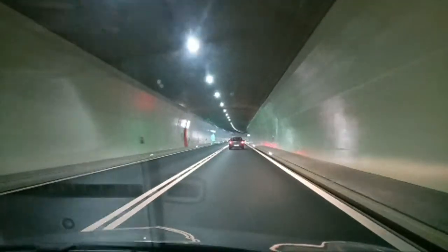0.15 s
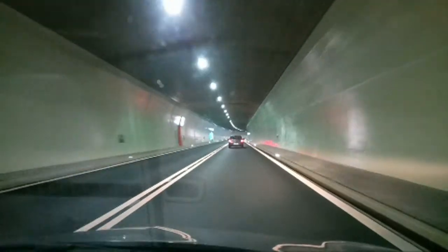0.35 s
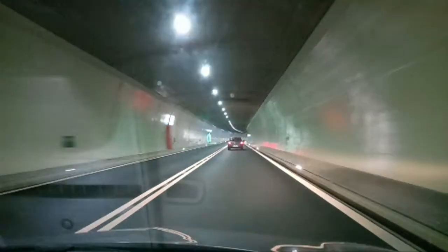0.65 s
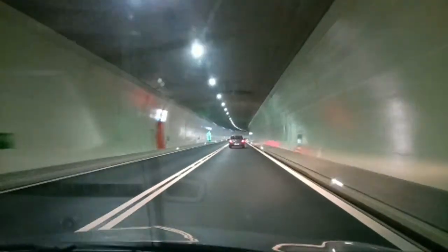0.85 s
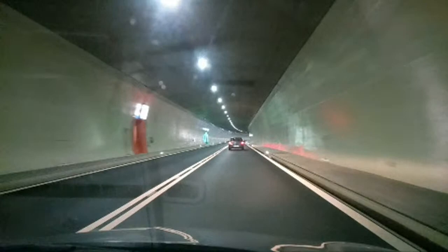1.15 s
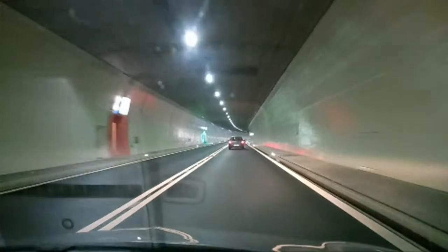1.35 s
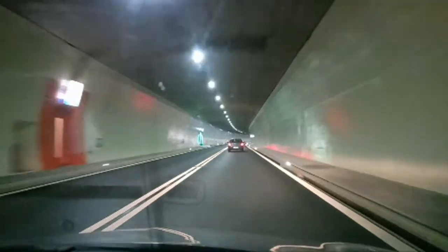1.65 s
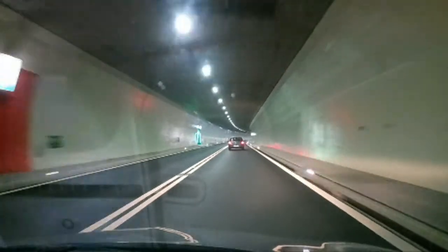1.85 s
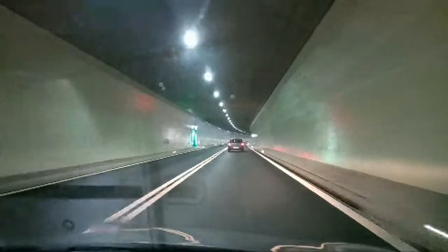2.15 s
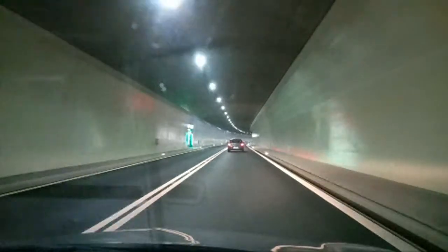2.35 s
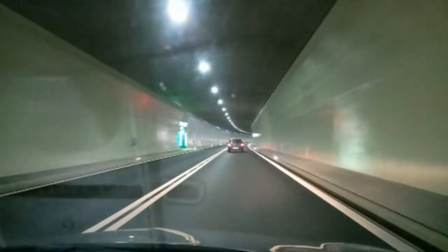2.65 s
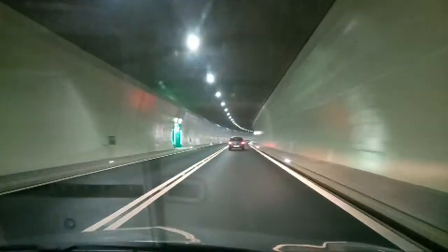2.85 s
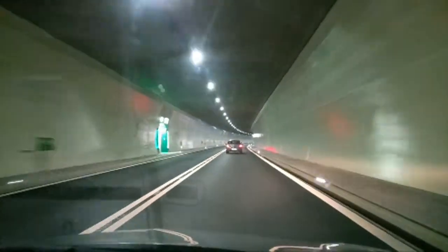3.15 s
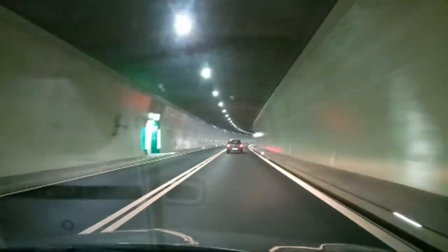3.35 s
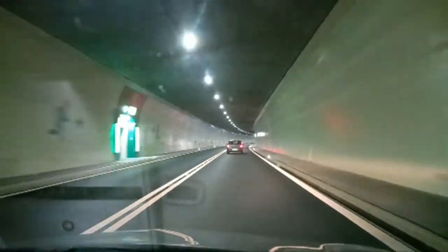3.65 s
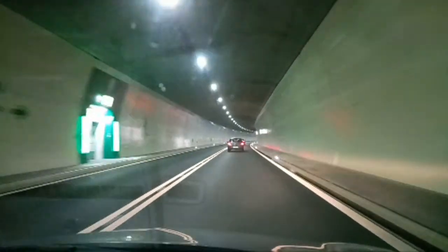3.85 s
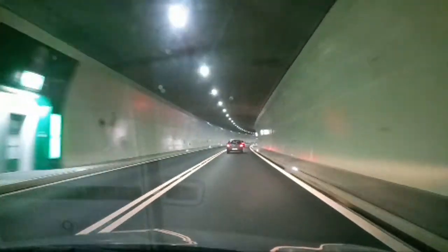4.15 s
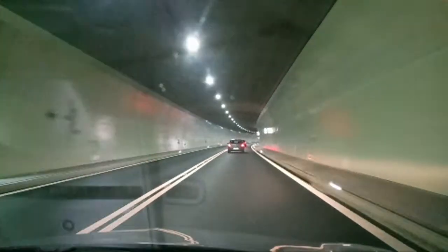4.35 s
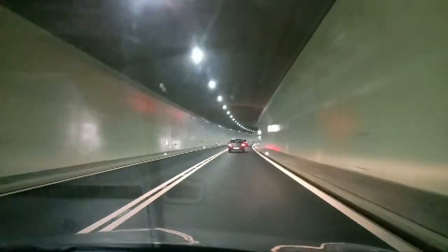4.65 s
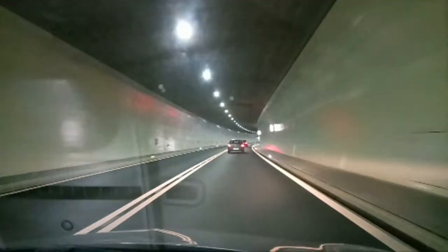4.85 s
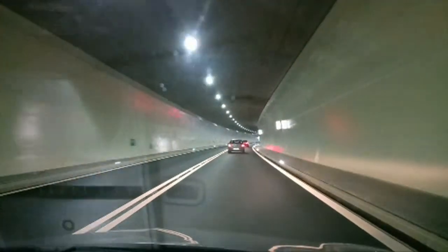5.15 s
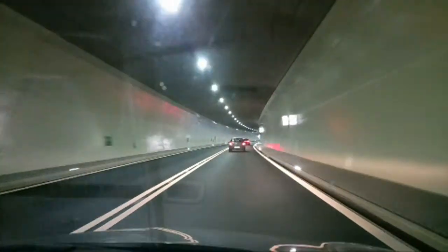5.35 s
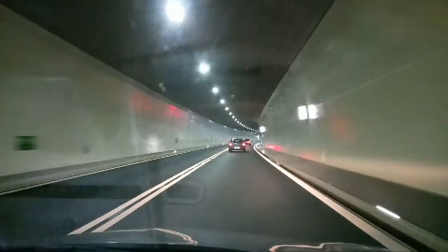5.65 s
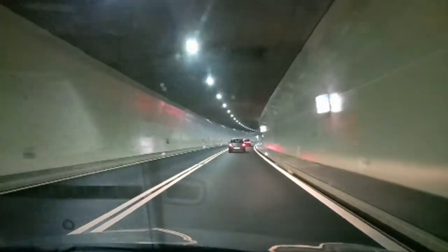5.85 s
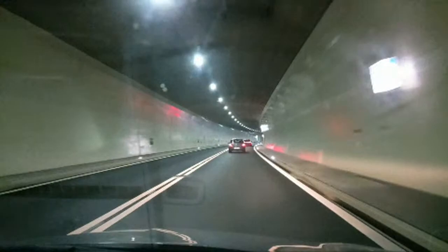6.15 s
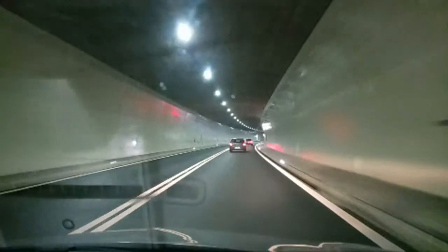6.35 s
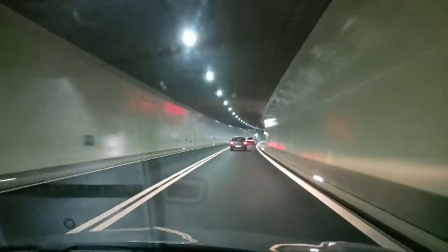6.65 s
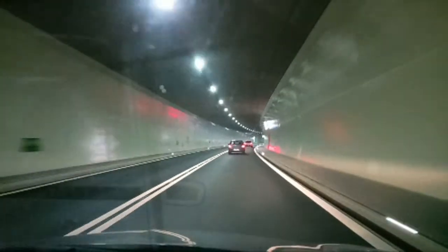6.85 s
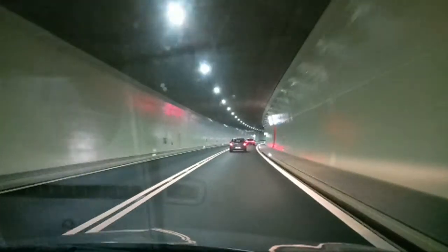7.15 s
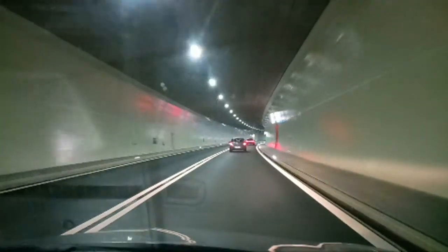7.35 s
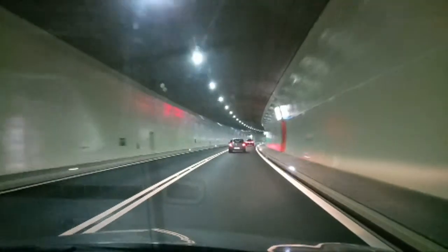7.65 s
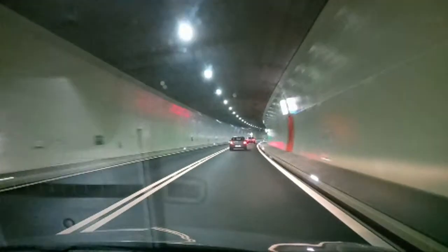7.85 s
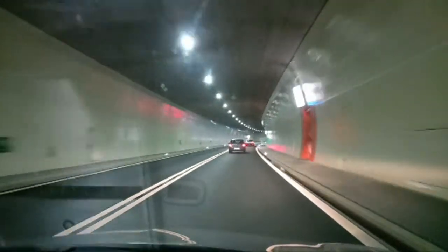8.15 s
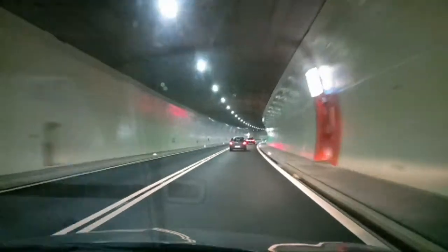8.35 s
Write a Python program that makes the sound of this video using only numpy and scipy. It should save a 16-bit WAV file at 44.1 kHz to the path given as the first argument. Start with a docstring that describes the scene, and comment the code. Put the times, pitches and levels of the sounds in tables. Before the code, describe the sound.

A car drives at steady speed through a road tunnel, heard from a small microphone by the windscreen. A deep road rumble fills the cabin throughout, together with a low, even engine drone and a softer, muffled tyre roar. One small dry click comes about a second in, and loose trim ticks very faintly now and then.

```python
"""The deep boom inside a car at steady speed in a tunnel: the road shakes the body, and the cabin rings.
The engine drones on one low tone. Tyre roar bounces off the tunnel walls and comes in through the
glass, and the tread sings softly. Loose trim rattles near a small microphone on the windscreen.
A thin hiss lies under it all, and two dry clicks sound early on."""
import sys
import numpy as np
from scipy import signal
from scipy.fft import rfft, irfft
from scipy.io import wavfile
from scipy.ndimage import uniform_filter1d

SR = 44100
rng = np.random.default_rng(int(sys.argv[2]) if len(sys.argv) > 2 else 0)


def persist_wave(psi):
    """Save psi, clipped to +-1, as 16-bit WAV."""
    counts = np.round(np.clip(psi, -1, 1) * 32767).astype(np.int16)
    wavfile.write(sys.argv[1], SR, np.atleast_2d(counts).T)


N = 374409

# The tone colour of the hiss. Each row: frequency in Hz, relative level in dB.
HISS_COLOUR = [(3500, -19.5), (4500, -8.5), (5500, -7.5), (6600, -5), (7450, -5.5), (7900, -5.5),
               (8400, -6.5), (8900, -21.5), (9800, -29), (11900, -25), (15560, -23), (15620, -1),
               (15730, -3.5), (15780, -21.5)]
# Dry clicks. Each row: time in seconds, strength in dB before filtering.
CLICKS = [(.8655, -22), (1.481, -44)]
# The short, bright tones that colour each tick of the rattle.
# Each row: pitch in Hz, relative level in dB, seconds to fade by 60 dB.
TICK_TONES = [(6950, -6, .010), (7450, 0, .013), (8000, -6, .010), (3000, -8, .008)]
# The louder ticks of the trim. Each row: start in seconds, peak level in dB.
TRIM_TICKS = [(0.128, -53), (0.5262, -57), (2.0298, -55), (2.2992, -58), (3.1048, -56), (4.4902, -52),
              (4.6794, -58), (5.1632, -58), (5.271, -58), (5.5713, -55), (6.3907, -54), (6.7029, -54),
              (7.0983, -57), (7.9384, -54)]
# Moments when the tread sings louder. Each row: middle in seconds, half-length in seconds, lift in dB.
TREAD_LIFTS = [(3.05, .35, 7), (7.6, .25, 5.5)]
# The tyre roar as it comes through body and glass. Each row: frequency in Hz, relative level in dB.
ROAR_COLOUR = [(250, -21.5), (400, -3), (487, 0), (618, -3), (700, -4.5), (960, -7), (1120, -13.5),
               (1500, -17), (1900, -22), (2350, -30), (2800, -28.5), (3500, -35), (4000, -36.5),
               (4600, -47), (6000, -63.5)]
# The revs sag a little, then recover. Each row: time in seconds, engine firings per second.
ENGINE_REVS = [(0, 83.8), (.7, 83.3), (1.1, 82.1), (2.3, 81.5), (3.1, 82.3), (5.0, 83.0), (8.49, 83.4)]
# A rougher road booms louder. Each row: time in seconds, level of the boom in dB.
ROAD_ROUGHNESS = [(0, -23), (.8, -24.5), (2.2, -22.5), (3.05, -21.5), (3.6, -23.5), (4.7, -20.5),
                  (5.3, -22), (6.2, -21), (6.7, -23), (8.49, -22.5)]
# Where the cabin's air and panels ring. Each row: pitch in Hz, width in Hz, relative level in dB.
CABIN_RESONANCES = [(44, 12, -26), (61, 5.2, -17.5), (76.4, 9.7, -10.5), (89, 42, -8), (109.2, 11, 1),
                    (124.5, 23, -1), (153.6, 12, -4), (169.6, 20, -7), (193, 12, -11), (216.7, 34, -10),
                    (232.3, 20, -9), (253, 12.3, -8.5), (289, 88, -18), (335.2, 16, -16.5),
                    (372.4, 38, -18.5), (418.4, 19, -23)]


def gain_of(db):
    """Turns decibels into a number to multiply by."""
    return 10 ** (np.asarray(db) / 20)


def unit_level(x):
    """Scales a signal so that its average level (rms) is 1."""
    return x / np.sqrt(np.mean(x ** 2) + 1e-20)


def curve(rows):
    """Joins rows of time and value with straight lines, giving a value for every sample."""
    times, values = np.transpose(rows)
    return np.interp(np.arange(N) / SR, times, values)


def drift(per_s):
    """A smooth random wobble of level 1 that changes about per_s times a second."""
    span = max(int(SR / per_s), 1)
    return unit_level(uniform_filter1d(uniform_filter1d(rng.standard_normal(N), span), span))


def coloured_noise(colour, patchy_db, size=1024):
    """Noise with a given tone colour, in which patches of pitch grow a little louder and softer."""
    hop = size // 4
    hz = np.fft.rfftfreq(size, 1 / SR)
    real, imag, patches = rng.standard_normal((N // hop + 5, len(hz), 3)).T
    patches = unit_level(uniform_filter1d(uniform_filter1d(patches, 10, axis=0), 10, axis=1))
    row_hz, row_db = np.transpose(colour)
    colour_db = np.interp(np.log(hz + 1), np.log(row_hz + 1), row_db)[:, None]
    spectra = (real + 1j * imag) * gain_of(colour_db + patchy_db * patches)
    return unit_level(signal.istft(spectra, nperseg=size, noverlap=size - hop)[1][:N])


def hiss():
    """A thin hiss, with a faint narrow band at the very top of the treble."""
    level_db = -73 + .5 * drift(per_s=15)
    return gain_of(level_db) * coloured_noise(HISS_COLOUR, patchy_db=-0.9)


def clicks():
    """Sharp, dry clicks with no bass and a softened treble."""
    spikes = np.zeros(N)
    for start, db in CLICKS:
        spikes[round(start * SR)] = gain_of(db)
    dull = signal.sosfilt(signal.butter(1, 2200, "low", fs=SR, output="sos"), spikes)
    return signal.sosfilt(signal.butter(2, 1300, "high", fs=SR, output="sos"), .92 * dull + .08 * spikes)


def trim_rattle(rattle_db=-76, base_knocks_per_s=1100):
    """Loose trim makes tiny knocks and a few louder ticks, all coloured by the same short, bright tones."""
    t = np.arange(1200) / SR
    tones = sum(gain_of(db - 60 * t / fade_s) * np.cos(2 * np.pi * hz * t + phase)
                for phase, (hz, db, fade_s) in enumerate(TICK_TONES))
    tones *= np.sin(np.pi / 2 * np.minimum(t / .0012, 1)) ** 2  # soft plastic gives a gentle start
    clumps = gain_of(np.clip(6.3 * drift(per_s=35), -6, 6))  # bumps bunch the knocks together
    strength = gain_of(5.2 * np.minimum(rng.exponential(1, N), 4)) * rng.choice([-1., 1.], N)
    knocks = strength * (rng.random(N) < clumps * base_knocks_per_s / SR)
    rattle = gain_of(rattle_db) * unit_level(signal.oaconvolve(knocks, tones)[:N])
    chatter_shape = signal.windows.tukey(400, .3) * np.exp(-np.arange(400) / 250)
    for start, db in TRIM_TICKS:
        chatter = rng.standard_normal(400) * chatter_shape
        tick = np.convolve(chatter, tones)
        at = round(start * SR)
        rattle[at:at + len(tick)] += gain_of(db) * tick / abs(tick).max()
    return rattle


def tread_song(pitch_hz=937, width_hz=110, base_db=-58, waver_db=2):
    """The tread blocks meet the road and sing: a narrow band of noise whose level slowly wavers."""
    hz, t = np.fft.rfftfreq(N, 1 / SR), np.arange(N) / SR
    band = 1 / (1 + (2 * (hz - pitch_hz) / width_hz) ** 2)
    lift_db = sum(db * np.exp(-((t - middle) / half) ** 2) for middle, half, db in TREAD_LIFTS)
    level_db = base_db + lift_db + waver_db * drift(per_s=2.6)
    return gain_of(level_db) * unit_level(irfft(rfft(rng.standard_normal(N)) * band, N))


def tyre_roar(average_db=-40, road_share=0.33):
    """Tyre noise, made dense by the tunnel walls, flutters slightly and grows on rougher road."""
    road_db = curve(ROAD_ROUGHNESS)
    level_db = average_db + road_share * (road_db - road_db.mean()) + drift(per_s=56)
    return gain_of(level_db) * coloured_noise(ROAR_COLOUR, patchy_db=0.95)


def engine_drone(cruise_hz=83, cruise_db=-26, db_per_hz=1.5):
    """The engine's firings blend into one clean tone that gets higher and louder with the revs."""
    firing_hz = curve(ENGINE_REVS)
    level_db = cruise_db + db_per_hz * (firing_hz - cruise_hz) + 0.88 * drift(per_s=2.5)
    phase = 2 * np.pi * np.cumsum(firing_hz) / SR
    return np.sqrt(2) * gain_of(level_db) * np.sin(phase)


def cabin_boom():
    """The rough road shakes the body, and the cabin picks out the pitches at which it rings."""
    hz = np.fft.rfftfreq(N, 1 / SR)
    shake = rng.standard_normal(N) * gain_of(0.73 * drift(per_s=45))
    # Each resonance is applied twice, which narrows it; then their powers are added.
    power = sum(gain_of(db) ** 2 / (1 + (2 * (hz - pitch) / width) ** 2) ** 2
                for pitch, width, db in CABIN_RESONANCES)
    boom = unit_level(irfft(rfft(shake) * np.sqrt(power), N))
    return gain_of(curve(ROAD_ROUGHNESS)) * boom


def scene():
    """All the sounds add up at one microphone."""
    mix = engine_drone() + cabin_boom() + tyre_roar() + tread_song() + hiss() + trim_rattle() + clicks()
    return mix[None]


def record(dry):
    """The microphone drops the lowest bass, its amplifier rounds the peaks, and the top treble is cut."""
    lowest_hz, highest_hz, peak_limit = 42, 15860, 0.86
    less_bass = signal.sosfilt(signal.butter(3, lowest_hz, "high", fs=SR, output="sos"), dry)
    rounded = peak_limit * np.tanh(less_bass / peak_limit)
    treble_cut = signal.firwin(2047, highest_hz, window=("kaiser", 9), fs=SR)
    return signal.oaconvolve(rounded, treble_cut[None], "same")


dry = scene()
out = record(dry)
persist_wave(out)
```